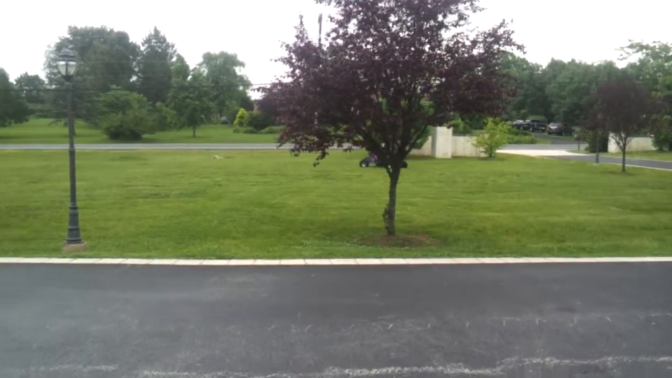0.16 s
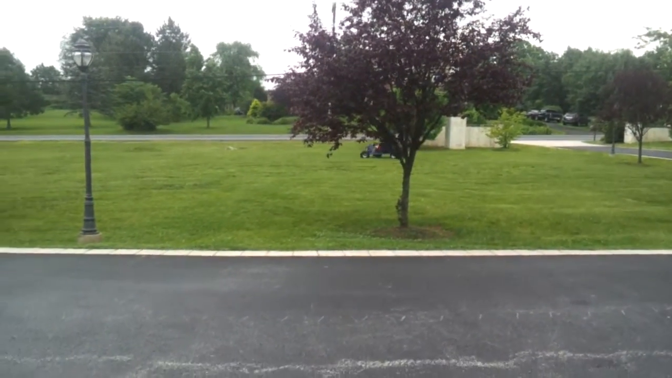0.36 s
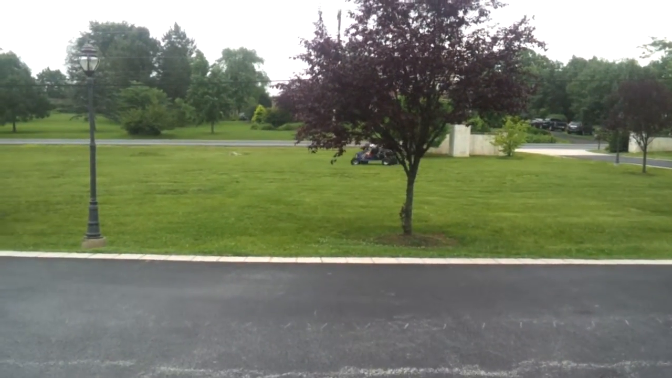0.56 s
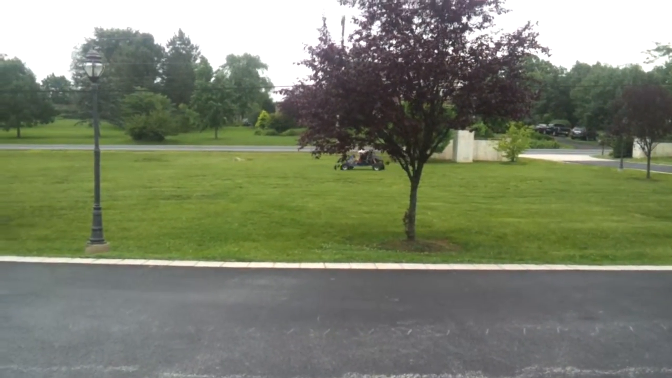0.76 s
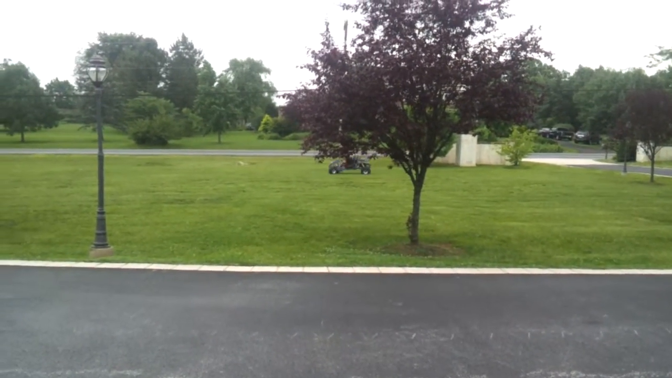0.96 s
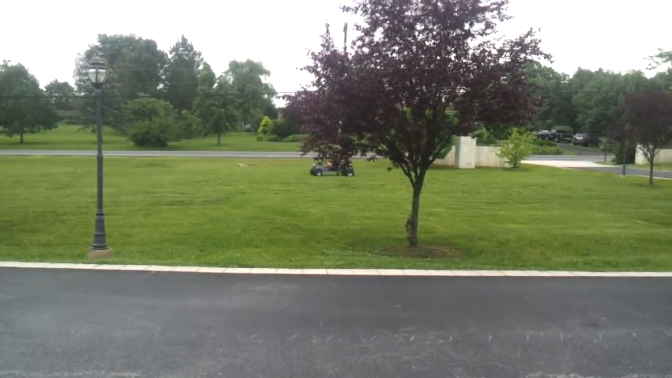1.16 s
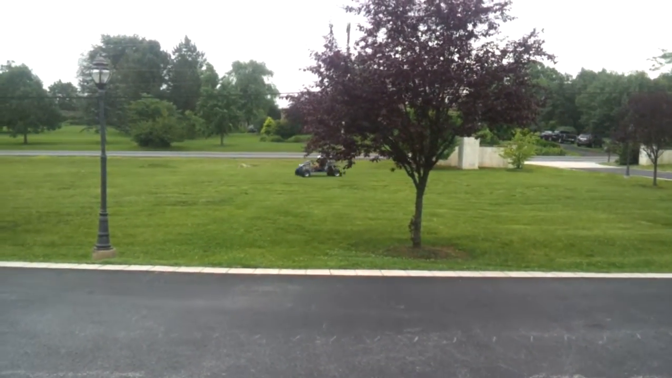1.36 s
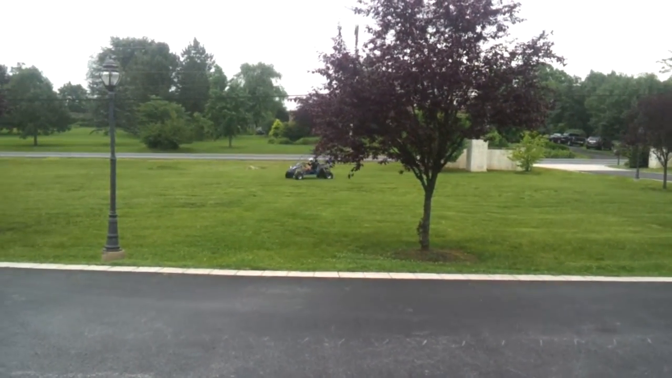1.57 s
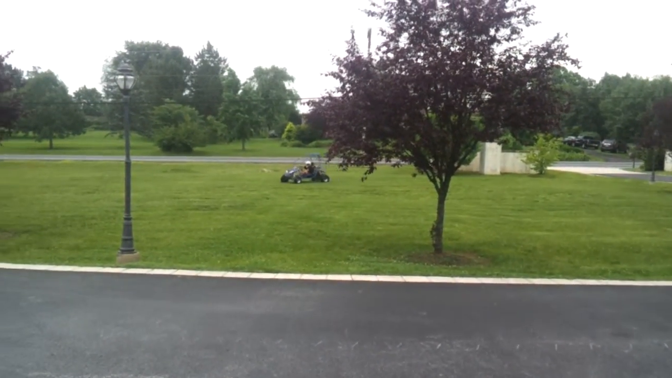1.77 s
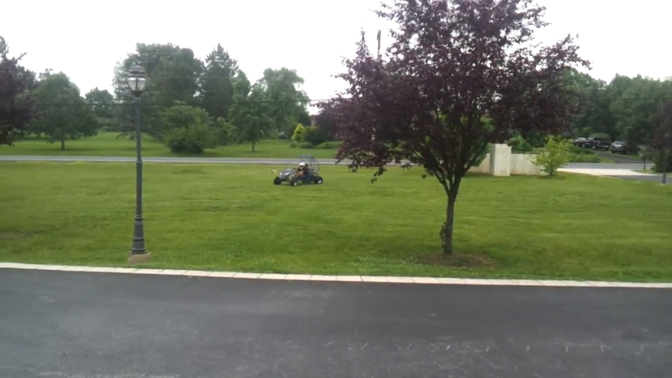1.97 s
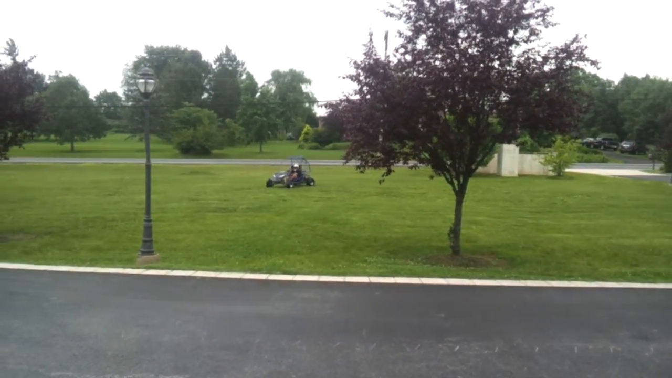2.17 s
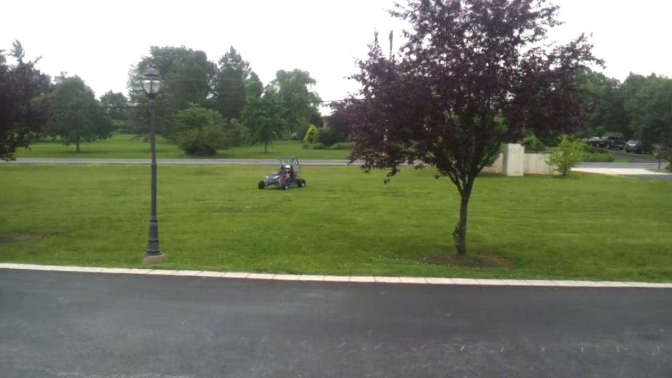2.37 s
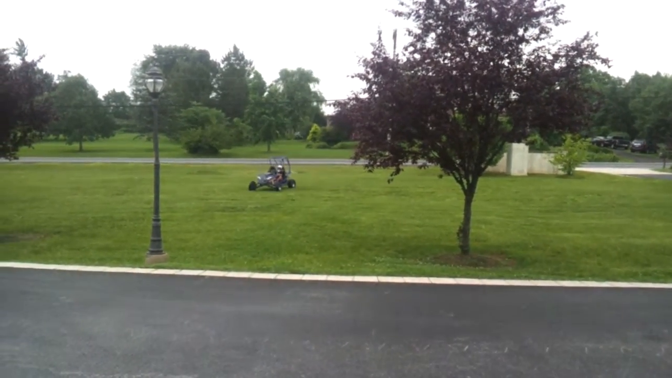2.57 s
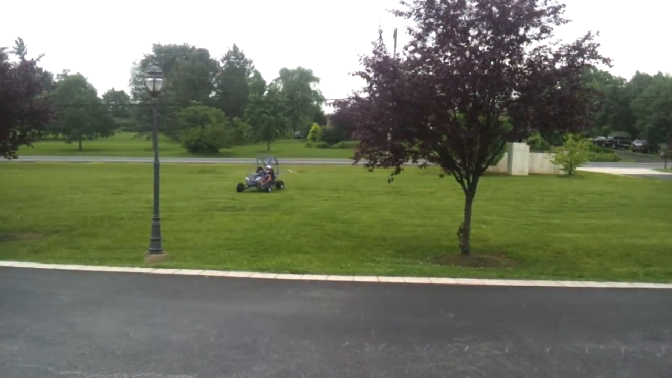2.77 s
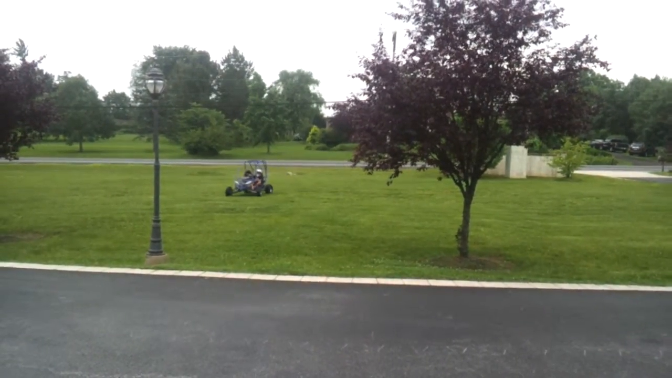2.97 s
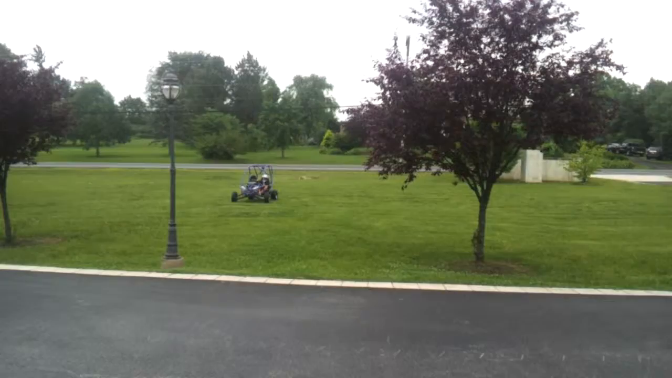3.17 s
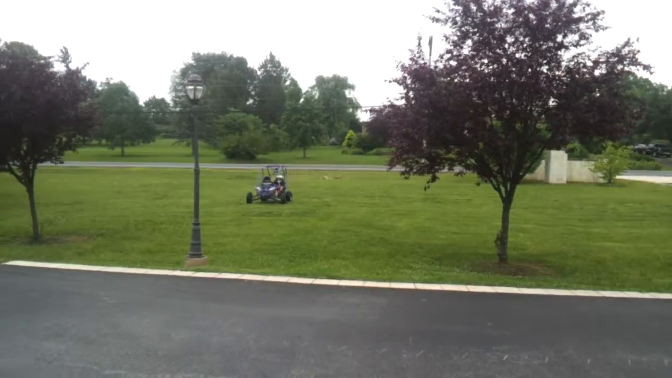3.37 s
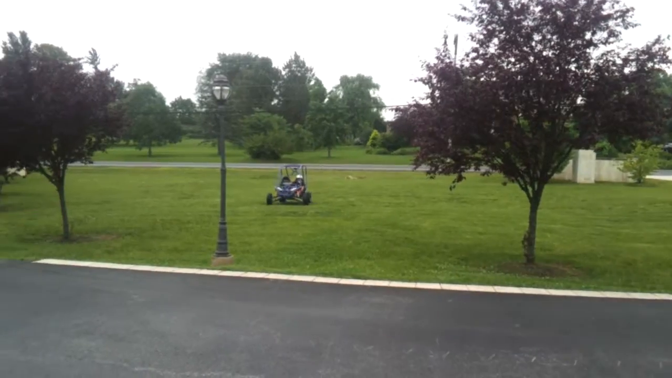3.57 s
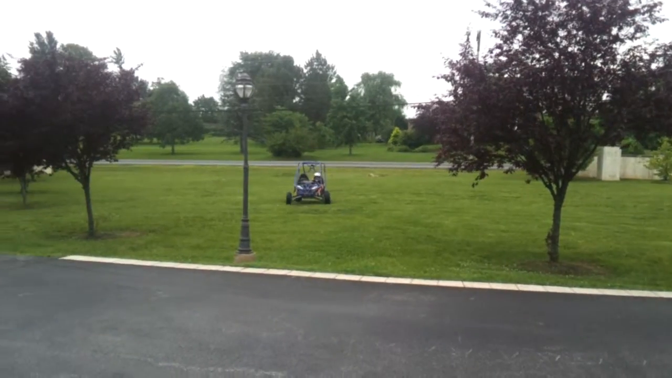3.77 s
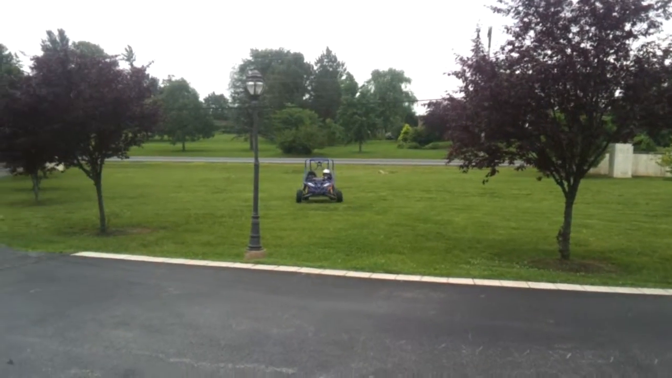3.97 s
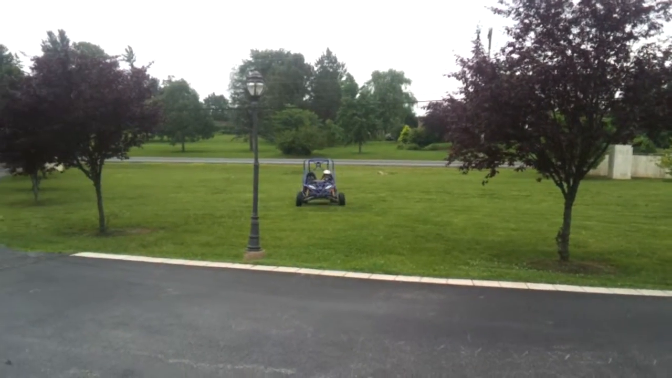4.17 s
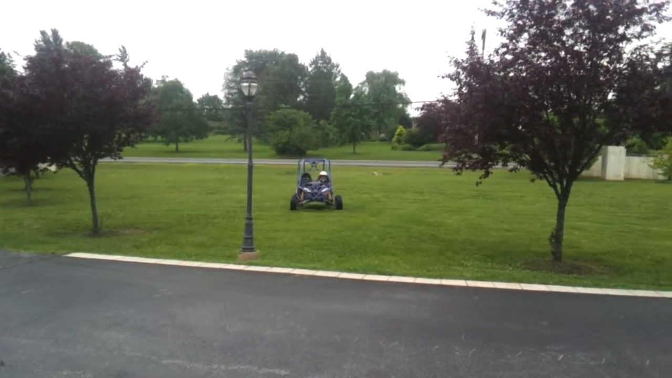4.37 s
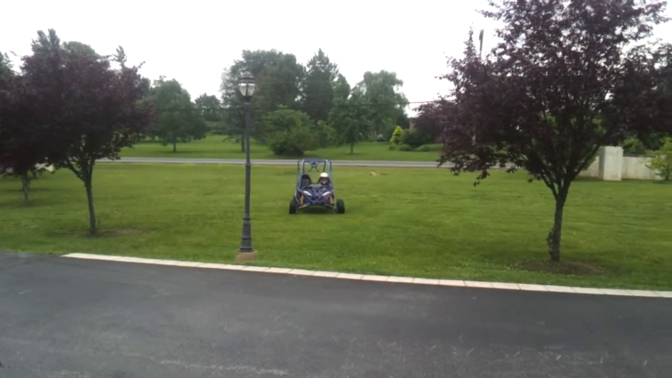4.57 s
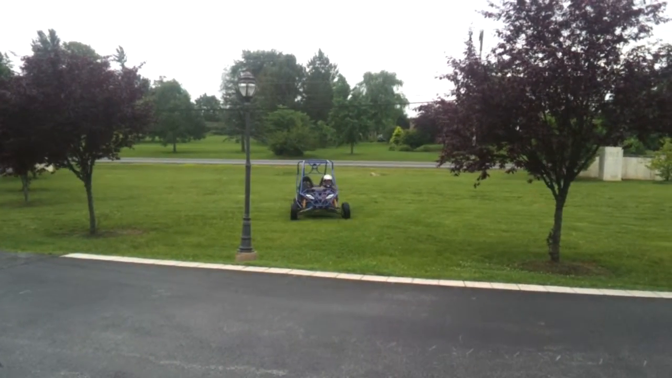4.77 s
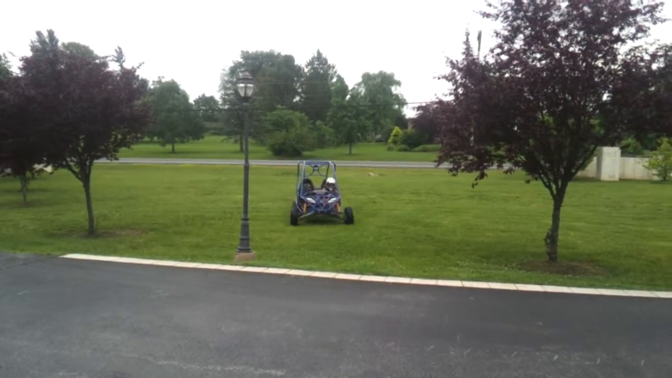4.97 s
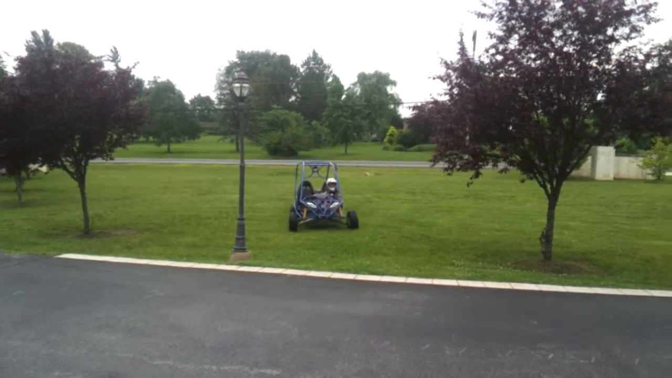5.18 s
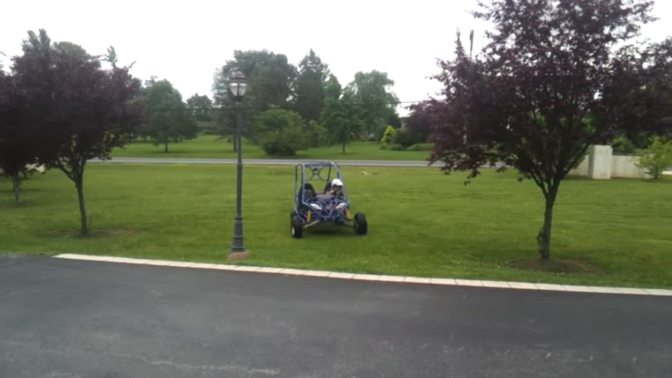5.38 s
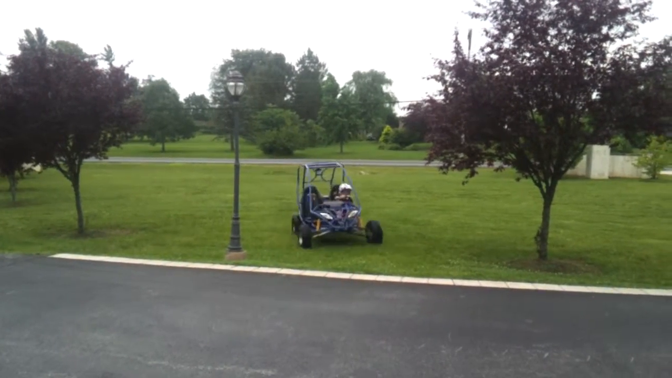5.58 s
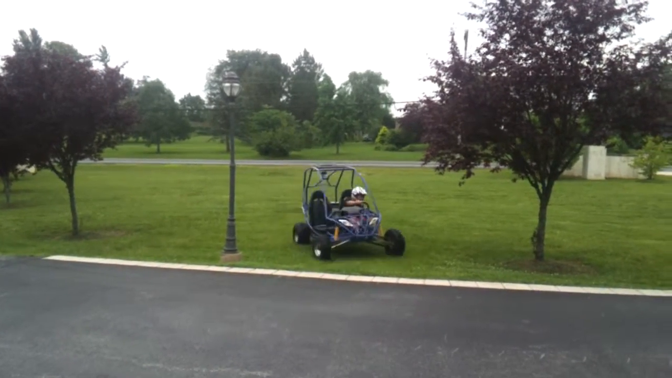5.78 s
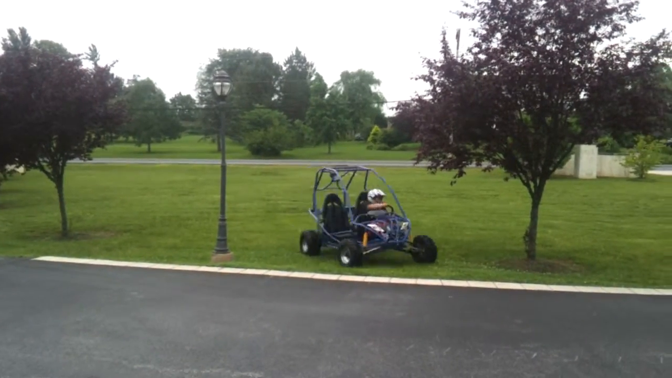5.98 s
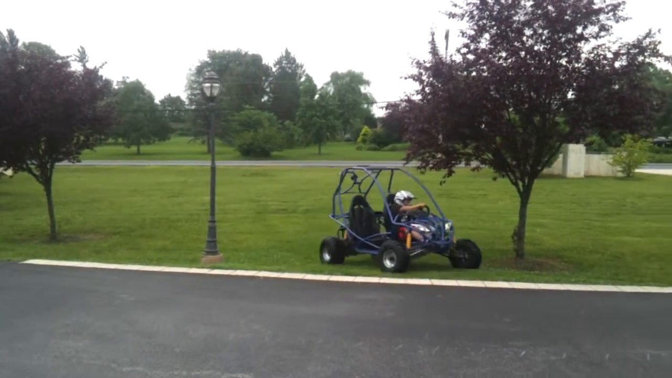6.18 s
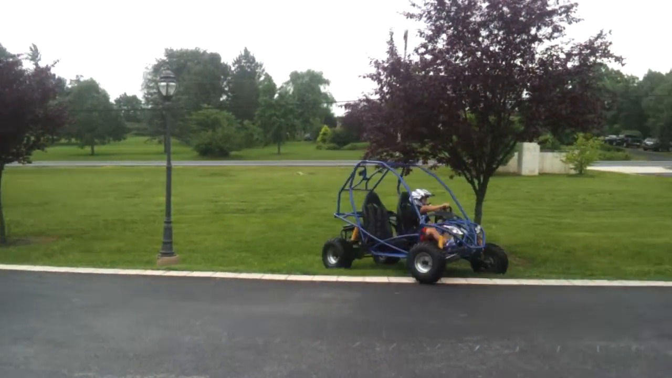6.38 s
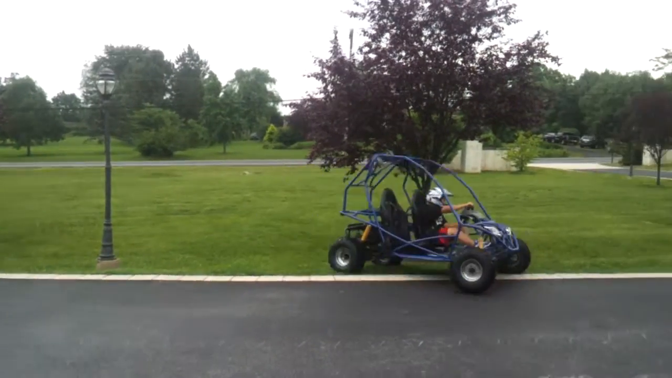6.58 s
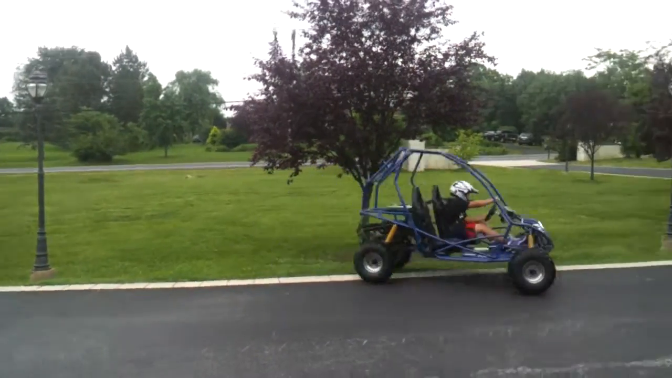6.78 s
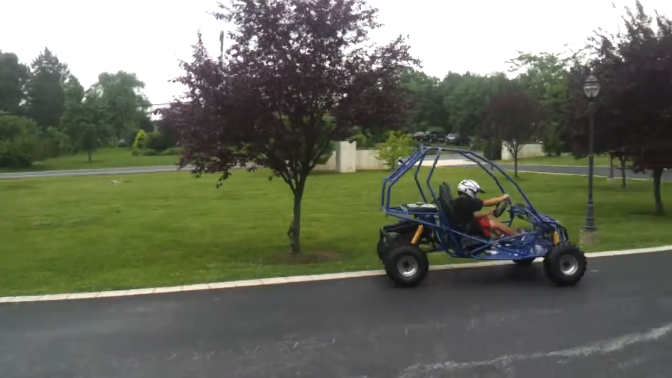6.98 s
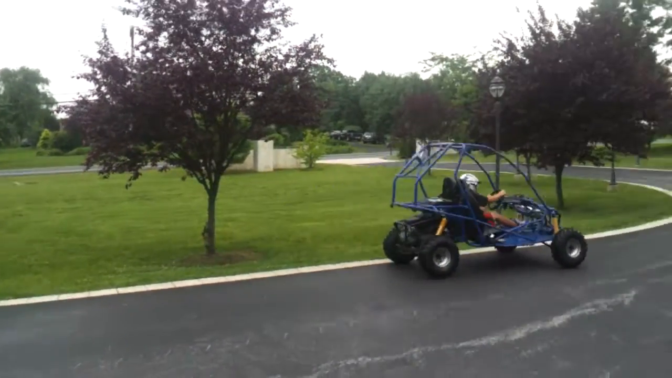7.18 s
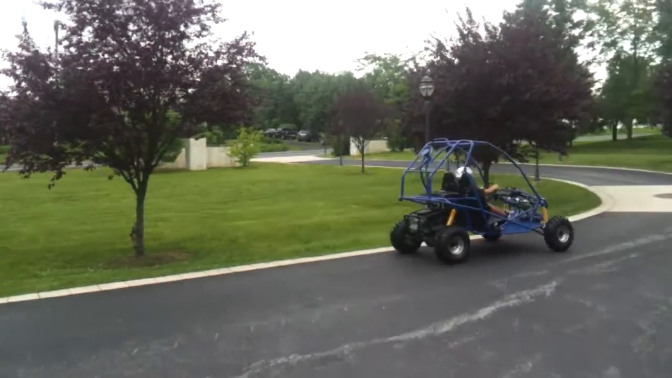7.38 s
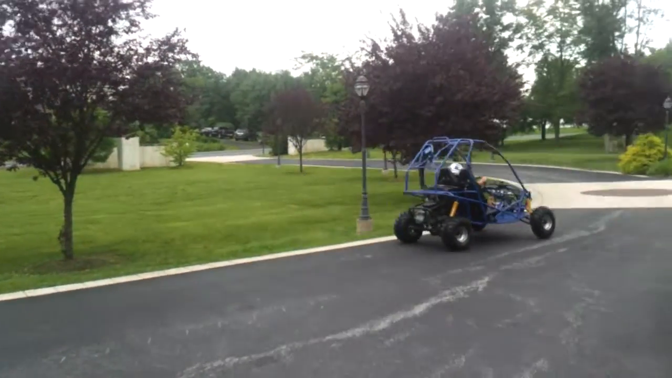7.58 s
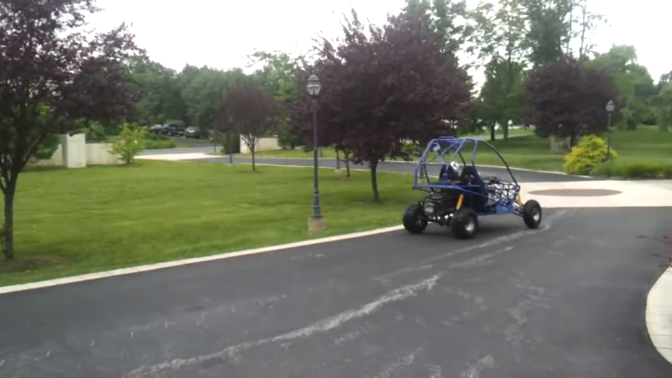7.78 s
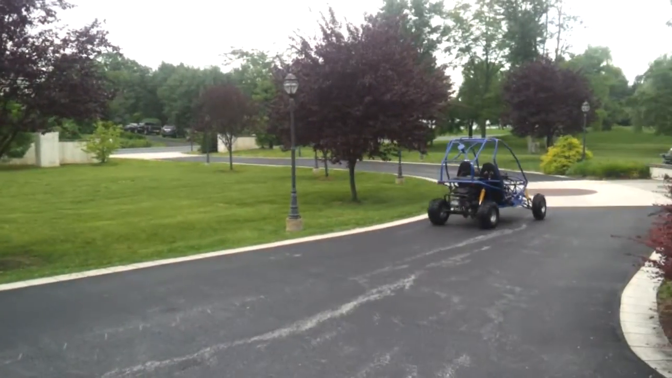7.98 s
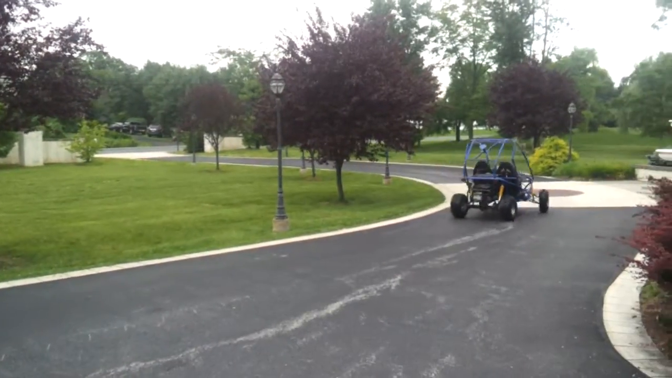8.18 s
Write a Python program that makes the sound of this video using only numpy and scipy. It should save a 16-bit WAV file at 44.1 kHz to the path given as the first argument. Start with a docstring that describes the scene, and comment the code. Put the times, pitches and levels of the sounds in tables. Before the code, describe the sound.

A small off-road buggy approaches from afar, its engine wavering over bumps, then putters and rattles past at close range.

```python
"""A buggy passing close by

A single-cylinder four-stroke buggy crosses a lawn from far away, passes close on a driveway and
eases off. Each firing drives the resonances of intake, muffler and pipe, with a turbulent puff of gas,
a rattle of the casing and a valve tick. Bumps swing the engine speed and shake the frame. Far off,
trees and houses smear the rattle into a rush; close by, every stroke stands out."""
import sys
import numpy as np
from scipy.fft import rfft, irfft, next_fast_len
from scipy.io import wavfile
from scipy.ndimage import uniform_filter1d, map_coordinates

SR = 44100
rng = np.random.default_rng(int(sys.argv[2]) if len(sys.argv) > 2 else 0)


def waveform_to_disk(signal):
    """Save audio, clipped to [-1, 1], as 16-bit WAV at the path in sys.argv[1]."""
    frames = np.transpose(np.atleast_2d(signal))
    scaled = np.clip(frames, -1, 1) * 32767
    samples = np.round(scaled).astype(np.int16)
    wavfile.write(sys.argv[1], SR, samples)


N = 362943

# Gas pulses at open throttle. Each row: time in seconds, base levels of intake, muffler and pipe in dB.
GAS_LEVELS = [(0, -38.5, -40, -34.5), (1.2, -38.5, -42.5, -40.5), (2.1, -35.5, -39.5, -42.5),
              (2.7, -32.5, -36, -40), (3.4, -30.5, -41.5, -41.5), (4.1, -34.5, -37, -37),
              (5.4, -30, -34, -31.5), (6.1, -29, -37, -30.5), (6.65, -25.5, -32, -31.5),
              (6.85, -25, -25, -24), (7.1, -23, -28.5, -27), (7.45, -22, -31.5, -25), (8, -27, -31, -27),
              (8.23, -23, -34, -35)]
# Rough engine noise. Each row: time in seconds, base levels of puffs, rattle and valve ticks in dB.
NOISE_LEVELS = [(0, -41, -38, -43), (.9, -42.3, -37.5, -46), (2.2, -41.5, -37.3, -44.5),
                (3.65, -40.5, -39.5, -50.5), (4.1, -40, -38.7, -46.5), (5.3, -38.5, -37, -42),
                (6.35, -35, -35.5, -36.5), (6.75, -30.5, -27.5, -30), (7, -31, -27, -31.5),
                (7.25, -27, -23.5, -27), (7.9, -26.5, -27.5, -27), (8.23, -32, -34, -36.5)]


def engine_speed():
    """Firings per second: each bump bounces the buggy on its tyres and adds a damped oscillation."""
    # Speed over smooth ground. Each row: time in seconds, firings per second.
    smooth_speed = [(0, 45.97), (.304, 42.63), (.471, 45.01), (.835, 44.73), (1.601, 46.58), (1.957, 48.2),
                    (2.727, 49.27), (3.289, 46.06), (3.448, 40.63), (4.014, 44.84), (4.552, 47),
                    (4.642, 41.16), (5.152, 47.04), (6.174, 48.51), (6.283, 45.26), (6.995, 45.95),
                    (7.939, 50.68), (8.23, 42.62)]
    # Each row: start in seconds, swing in firings per second.
    bumps = [(.216, 2.4), (1.21, 1.5), (2.287, 1.5), (2.687, 1.1), (4.602, 1.7), (4.899, 3.6), (5.298, 1.5),
             (5.749, 2), (6.041, 1.7), (6.74, 3.6), (6.826, 4.1)]
    bounce_hz, decay_s = 5, .3
    rate, = curves(smooth_speed)
    for start, swing in bumps:
        age = np.maximum(np.arange(N) / SR - start, 0)
        rate = rate + swing * np.sin(2 * np.pi * bounce_hz * age) * np.exp(-age / decay_s)
    return rate


def throttle_lift():
    """Closure of the throttle, which restricts the gas flow: 0 is open, 1 is shut."""
    # The driver eases off. Each row: start in seconds, end in seconds, depth from 0 to 1.
    lifts = [(0.383, 0.457, 0.6), (.61, .85, 0.45), (2.864, 3.31, 0.4), (3.3, 3.494, 0.9),
             (3.5, 3.88, 0.54), (4.598, 4.773, .9), (6.173, 6.416, 0.3), (6.42, 6.974, 0.14),
             (8.057, 8.4, 0.95)]
    travel_s = 0.071
    t = np.arange(N) / SR
    pedal = lambda s: np.clip((t - s) / travel_s + .5, 0, 1)
    return np.clip(sum(depth * (pedal(start) - pedal(end)) for start, end, depth in lifts), 0, 1)


def intake(cycle, lift, rear):
    """Forced resonance: suction pulses make the intake boom above a thud at the firing rate."""
    # Each row: resonance in Hz, width in Hz, relative level in dB.
    modes = [(94, 19, 0)]
    shut_db = -14
    gulps = -pulses(cycle, at=0.25, scatter_db=1, jitter_s=.00008)
    thud = amp(-12.5 + 5 * rear) * np.sin(2 * np.pi * (cycle - .4))
    gain = amp(curves(GAS_LEVELS)[0] + shut_db * lift + 1.4 * wobble(5.6))
    return gain * (ring(gulps, modes) + thud)


def muffler(cycle, lift, rear):
    """Cavity resonance: gas pulses sustain two modes, and thump in more damped ones on the overrun."""
    # Muffler modes. Each row: frequency in Hz, width in Hz, relative level in dB.
    low_mode = [(145.5, 22, 0)]
    high_mode = [(191.6, 23, 0)]
    thump_modes = [(136, 49, 1.5), (320, 52, -9.5)]
    faded_lift, overrun_lift = .32, .55  # the low mode has faded; the thumps begin
    eased = np.minimum(lift / faded_lift, 1)
    overrun = np.clip((lift - overrun_lift) / (1 - overrun_lift), 0, 1)
    detour = 1 - rear  # from the front the parts arrive by different paths and merge into a drone
    low = ring(-pulses(cycle - 0.081 * detour, at=0.11, scatter_db=0, jitter_s=.00008), low_mode)
    high = ring(-pulses(cycle - 0.387 * detour, at=0.11, scatter_db=3.2, jitter_s=.00008), high_mode)
    thumps = ring(-pulses(cycle, at=.13, scatter_db=3.5, jitter_s=.0001), thump_modes)
    low *= amp(-15.5 * eased)
    high *= amp(-2.5 + eased + 1.9 * wobble(8))
    thumps *= overrun * amp(6.5 + 4 * rear)
    return amp(curves(GAS_LEVELS)[1] + 0.33) * (low + high + thumps)


def pipe_bark(cycle, lift, rear):
    """Standing waves: pressure fronts excite the pipe's modes, and the weight slides among them."""
    # Each row: frequency in Hz, width in Hz, extra delay heard from the front in cycles.
    modes = [(223.7, 18, 0.307), (278.7, 35.5, 0.549), (320.5, 53, 0.4483)]
    # Each row: time in seconds, centre from 0 (lowest mode) to 1 (highest), spread on that scale.
    balance = [(0, 0.09, 0.26), (1.2, 0.23, 0.28), (2.1, 0.54, 0.3), (2.8, .66, 0.34), (3.8, 0.33, 0.6),
               (5.4, 0.48, 0.54), (6.1, .58, 0.5), (6.25, .15, 0.86), (8.23, 0.05, 0.54)]
    shut_db = -4.5
    centre, spread = curves(balance)
    bark = np.zeros(N)
    for place, (hz, width, lag) in zip(np.linspace(0, 1, len(modes)), modes):
        fronts = pulses(cycle - lag * (1 - rear), at=0.012, scatter_db=-0.3, jitter_s=.00006)
        weight = np.exp(-.5 * ((place - centre) / spread) ** 2)
        bark += weight * ring(fronts, [(hz, width, 0)])
    return amp(curves(GAS_LEVELS)[2] + 0.78 + shut_db * lift) * even(bark)


def tailpipe(cycle, near, rear):
    """A pulsed jet: each firing rings the tailpipe with a pop and lets out a turbulent puff."""
    # Each row: resonance in Hz, width in Hz, relative level in dB.
    modes = [(391, 56, 3), (517, 70, -2), (593, 53, 1), (710, 140, -3.5), (839, 70, -3.5), (1148, 36, 0.5)]
    # Puff spectra, far and near. Each row: frequency in Hz, relative density in dB.
    puff_far = [(300, -25.5), (400, -9), (520, -7.5), (650, -6.5), (770, -1.5), (870, 0), (1050, -4),
                (1360, -27.5), (2300, -120)]
    puff_near = [(220, -32), (380, -0.5), (460, -7.5), (584, -1), (666, -1), (817, -3.5), (948, -18),
                 (1050, -20.5), (1360, -33.5), (2310, -120)]
    pops = ring(pulses(cycle, at=.01, scatter_db=.8, jitter_s=.00003), modes)
    puffs = blend(noise(puff_far), noise(puff_near), near)
    puffs *= bursts(cycle, at=-.06, length=.08, height=0.13 + 0.28 * near, scatter_db=1.2)
    pop_share = .33 * np.minimum(3.5 * near, 1) + .38 * rear ** 2  # greatest from close behind
    return amp(curves(NOISE_LEVELS)[0] - 1.36 + 1.1 * near) * blend(puffs, pops, pop_share)


def casing(cycle, near, rear):
    """Structure-borne sound: combustion rattles the casing and rings its metal."""
    # Rattle spectra, far and near. Each row: frequency in Hz, relative density in dB.
    rattle_far = [(560, -33), (950, -3.5), (1190, 3), (1310, 0), (1670, 1.5), (1990, 1.5), (2170, -0.5),
                  (2540, -3), (2870, -14.5), (3000, -10), (3900, -47), (6600, -120)]
    rattle_near = [(560, -43.5), (950, -2), (1160, -4), (1270, -4.5), (1460, -2), (1770, -4), (2030, 2.5),
                   (2290, -1.5), (2550, -3.5), (2690, -5.5), (2910, -12.5), (3000, -7), (3900, -35),
                   (6600, -120)]
    # Metallic ring, strongest side-on. Each row: time in seconds, level against the rattle in dB.
    ring_levels = [(0, -22), (5.8, -17), (6.5, -8), (6.98, -5.5), (7.1, 0), (7.3, -1), (7.45, -3.5),
                   (7.8, -17), (8.23, -30)]
    rattle = blend(noise(rattle_far), noise(rattle_near), near)
    rattle *= bursts(cycle, at=-0.016, length=0.053, height=0.53 + 1.4 * near, scatter_db=2.0)
    metal = amp(curves(ring_levels)[0]) * clank(cycle, rear)
    return amp(curves(NOISE_LEVELS)[1] - 0.78 - 0.64 * near + 0.63 * wobble(16)) * (rattle + metal)


def clank(cycle, rear):
    """Impact excitation: each firing strikes the metal's modes, each with its own directivity."""
    # Each row: frequency in Hz, width in Hz, relative level in dB, gain from behind in dB.
    modes = [(1490, 120, -6, 3), (2110, 44, -4, -13), (2604, 210, 1.5, 2), (3213, 270, 6.5, -9),
             (4560, 340, -18, 5.5), (5600, 220, -13, 1.5), (6130, 250, -14.5, 9)]
    metal = np.zeros(N)
    for hz, width, db, behind_db in modes:
        blows = pulses(cycle, at=.11, scatter_db=2, jitter_s=.0008)
        blows = uniform_filter1d(blows, size=SR // 200) * rng.standard_normal(N)  # a blow lasts 5 ms
        ringing = filtered(blows, lambda f: resonance(f, hz, width) ** 2)
        metal += amp(db + behind_db * rear) * unit(ringing)
    return even(metal)


def valve_gear(cycle, near):
    """Impact noise: the valves tick after each firing, and thin covers resonate with the vibration."""
    # Tick spectra, far and near. Each row: frequency in Hz, relative density in dB.
    tick_far = [(1650, -30), (2800, 0.5), (2900, -5.5), (3510, 0), (3840, -2.5), (4330, 1.5), (4740, -6.5),
                (6190, -17.5), (7360, -29), (9570, -58.5), (16200, -120)]
    tick_near = [(1650, -33), (2800, 0.5), (2940, -12), (3210, 1.5), (4110, -3), (4460, -4), (4810, -3.5),
                 (5180, -3), (5610, -7.5), (6090, -9), (7360, -25.5), (9570, -66), (16200, -120)]
    # Each row: time in seconds, height of a tick as a ratio to the steady rush.
    tick_heights = [(0, 2.3), (.55, 2.3), (.8, 1.3), (3.5, 0.46), (5.5, 1.42), (6.9, 0.67), (7.25, 2.8),
                    (7.6, 3.1), (8.23, 1.7)]
    # Each row: resonance in Hz, width in Hz, relative level in dB.
    cover_modes = [(2544, 230, 3), (4400, 210, -3.5)]
    ticks = blend(noise(tick_far), noise(tick_near), near)
    ticks *= bursts(cycle, at=0.16, length=0.081, height=curves(tick_heights)[0], scatter_db=1.5)
    covers = np.zeros(N)
    for hz, width, db in cover_modes:
        covers += amp(db + 1.8 * wobble(35)) * ring(rng.standard_normal(N), [(hz, width, 0)])
    gain = amp(curves(NOISE_LEVELS)[2] - 0.5 - 2.1 * near + 0.72 * wobble(14))
    return gain * (ticks + amp(-8.5) * covers)


def frame_knocks():
    """Damped vibration: a drop over the kerb, cushioned by the tyres, shakes the hollow frame."""
    # Each row: start in seconds, level in dB.
    drops = [(6.29, -27.5), (6.801, -20.5)]
    # Each row: resonance in Hz, width in Hz, relative level in dB.
    modes = [(540, 170, -2), (700, 97, -6), (866, 130, -4.5)]
    rise_s, t60_s = 0.02, 0.59
    shake = np.zeros(N)
    for start, db in drops:
        age = np.maximum(np.arange(N) / SR - start, 0)
        shake += amp(db - 60 * age / t60_s) * (1 - np.exp(-age / rise_s))
    return shake * ring(rng.standard_normal(N), modes)


def clinks():
    """Free decay: each jolt rings a loose metal part for a moment."""
    # Each row: start in seconds, level in dB.
    jolts = [(.08, -39), (.5, -38), (2.43, -43.5), (3.33, -41), (4.14, -44), (5.872, -32.5), (5.935, -34),
             (6.068, -31.5)]
    # Each row: resonance in Hz, width in Hz, relative level in dB.
    modes = [(2650, 200, -3), (4360, 350, 9), (5300, 400, -8), (6050, 210, -8.5)]
    t60_s = 0.088
    t = np.arange(N) / SR
    strikes = sum(amp(db - 60 * np.abs(t - start) / t60_s) * (t > start) for start, db in jolts)
    return strikes * ring(rng.standard_normal(N), modes)


def rolling():
    """Contact noise of tyres and frame on the ground, growing as the buggy comes close."""
    # Each row: frequency in Hz, relative density in dB.
    spectrum = [(15, -19), (35, -17), (62, -11), (100, -17), (170, -3.5), (320, -2.5), (450, -20),
                (1200, -58)]
    return amp(curves(NOISE_LEVELS)[0] - 7) * noise(spectrum)


def squeaks():
    """Faint rising tones, roughened by random frequency modulation."""
    # Each row: start in seconds, length in seconds, first and last pitch in Hz, peak level in dB.
    glides = [(0.962, 0.1, 5950, 6300, -56), (3.818, 0.051, 3850, 4010, -46)]
    tones = np.zeros(N)
    for start, length, first_hz, last_hz, db in glides:
        progress = np.clip((np.arange(N) / SR - start) / length, 0, 1)
        hz = first_hz + (last_hz - first_hz) * progress + 110 * wobble(600)
        tones += amp(db) * np.sin(np.pi * progress) * np.sin(2 * np.pi * np.cumsum(hz) / SR)
    return tones


def outdoor_rumble():
    """Stationary background noise, strongest at low frequencies."""
    # Each row: frequency in Hz, relative density in dB.
    spectrum = [(15, -24.5), (30, -15.5), (45, -9.5), (62, -6), (80, -2.5), (130, -5.5), (230, -13.5),
                (330, -17), (600, -36.5), (1200, -74)]
    return amp(-40) * noise(spectrum)


def pulses(cycle, at, scatter_db, jitter_s):
    """An impulse train: one per engine cycle at phase `at`, uneven in size and timing."""
    turns = np.arange(int(cycle[-1]) + 1) + at
    chance = rng.standard_normal((len(turns), 2))
    where = np.interp(turns, cycle, np.arange(N)) + jitter_s * SR * chance[:, 0]
    sizes = amp(scatter_db * chance[:, 1]) * (turns > cycle[0]) * (turns < cycle[-1])
    return np.bincount(np.clip(where, 0, N - 1).astype(int), sizes, N)


def bursts(cycle, at, length, height, scatter_db):
    """Amplitude modulation of rms 1: a bed plus one burst a cycle, peaking `length` cycles after `at`."""
    turn = cycle - at + 2
    age = turn % 1 / length
    size = amp(scatter_db * rng.standard_normal(1000))[turn.astype(int)]
    return even(np.sqrt(1 + (height * size * age * np.exp(1 - age)) ** 2))


def resonance(f, centre, width):
    """Complex response of a damped oscillator."""
    return 1j * f * width / (centre * centre - f * f + 1j * f * width)


def ring(x, modes):
    """Resonant colouring at a steady level; zero phase keeps pulses compact."""
    body = lambda f: sum(amp(db) * np.abs(resonance(f, hz, width)) ** 2 for hz, width, db in modes)
    return even(filtered(x, body))


def noise(spectrum):
    """Gaussian noise of rms 1 with the given spectral shape."""
    hz, db = np.transpose(spectrum)
    gain = lambda f: amp(np.interp(np.log(f + 1), np.log(hz + 1), db, right=-120))
    return unit(filtered(rng.standard_normal(N), gain))


def filtered(x, response):
    """Linear filtering: the spectrum of x times a frequency response."""
    size = next_fast_len(N + SR // 2)
    return irfft(rfft(x, size) * response(np.fft.rfftfreq(size, 1 / SR)), size)[:N]


def wobble(rate):
    """A smooth random curve with `rate` knots a second."""
    return map_coordinates(rng.standard_normal(int(N * rate / SR) + 4), [np.arange(N) * rate / SR])


def curves(rows):
    """Linear interpolation, per sample, of each column after the time."""
    times, *columns = np.transpose(rows)
    return [np.interp(np.arange(N) / SR, times, column) for column in columns]


def blend(a, b, share):
    """Equal-power mix with the given share of b."""
    share = np.clip(share, 0, 1)
    return np.sqrt(1 - share) * a + np.sqrt(share) * b


def even(x):
    """Hold the running rms at 1."""
    power = uniform_filter1d(uniform_filter1d(x ** 2, size=SR // 12), size=SR // 15)
    return x / np.sqrt(np.abs(power) + 1e-20)


def unit(x):
    """Scale to rms 1."""
    return x / np.sqrt(np.mean(x ** 2) + 1e-20)


def amp(db):
    """Decibels to amplitude ratio."""
    return 10 ** (np.asarray(db) / 20)


def scene():
    """Superposition of all sources; one crankshaft locks the engine's sounds in phase."""
    # How directly the engine is heard. Each row: time in seconds, share from 0 to 1.
    directness = [(0, 0.03), (3.5, .01), (4.8, 0), (5.4, 0.17), (6, 0.38), (6.6, 0.46), (7.2, 0.97),
                  (7.9, 0.71), (8.23, 0.8)]
    # How squarely the tailpipe faces the listener. Each row: time in seconds, share from 0 to 1.
    facing = [(0, 0.05), (6, 0.03), (6.8, 0.41), (7.25, 0.67), (7.65, 0.97), (8.23, 0.86)]
    near, = curves(directness)
    rear, = curves(facing)
    cycle = np.cumsum(engine_speed()) / SR
    lift = throttle_lift()
    gas = intake(cycle, lift, rear) + muffler(cycle, lift, rear)
    gas += pipe_bark(cycle, lift, rear) + tailpipe(cycle, near, rear)
    machinery = casing(cycle, near, rear) + valve_gear(cycle, near)
    chassis = frame_knocks() + clinks() + rolling()
    return (gas + machinery + chassis + squeaks() + outdoor_rumble())[None]


def record(dry):
    """Band limiting: a steep low-pass filter removes the highest treble."""
    cutoff_hz = 7280
    return filtered(dry[0], lambda hz: 1 / np.sqrt(1 + (hz / cutoff_hz) ** 160))[None]


dry = scene()
out = record(dry)
waveform_to_disk(out)
```